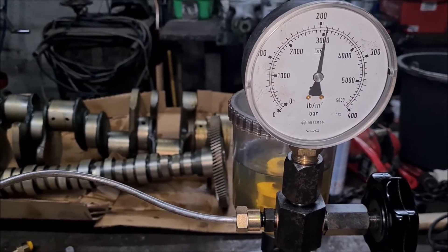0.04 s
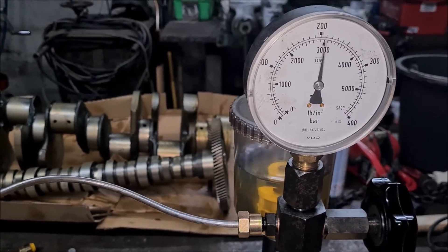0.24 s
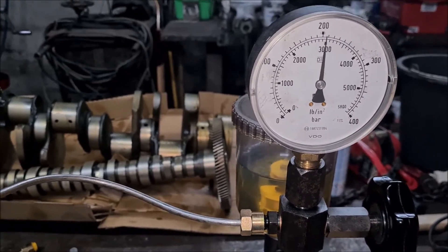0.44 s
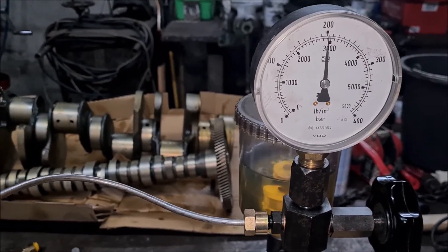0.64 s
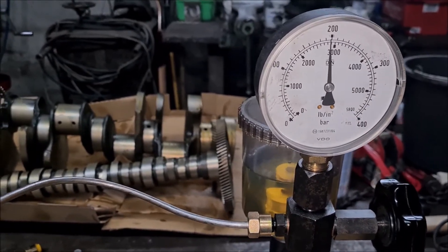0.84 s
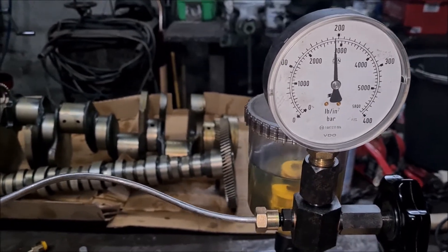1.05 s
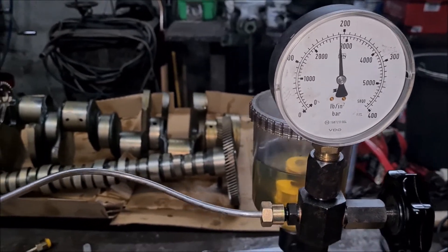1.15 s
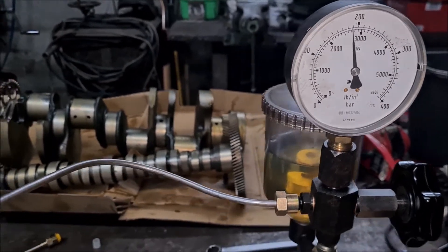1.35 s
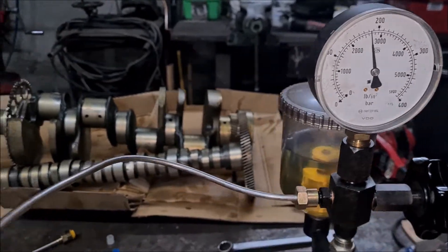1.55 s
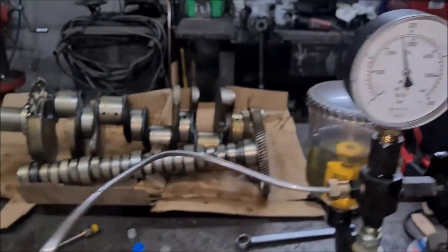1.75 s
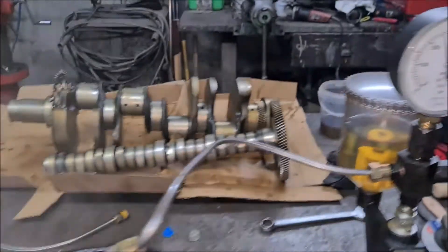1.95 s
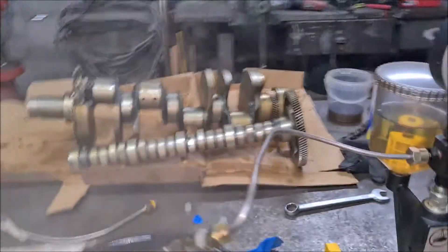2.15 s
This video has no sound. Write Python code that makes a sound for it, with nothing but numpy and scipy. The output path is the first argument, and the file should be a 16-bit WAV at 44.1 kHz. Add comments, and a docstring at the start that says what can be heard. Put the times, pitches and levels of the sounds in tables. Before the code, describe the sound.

One short, hissing chatter from a diesel injector, then handling knocks in a small workshop.

```python
"""A diesel injector chatters on a hand-pumped tester in a small workshop: five quick pops of its needle.
In each pop the needle clacks open and shut, spits a hiss of fuel and sets the steel parts ringing;
an earlier burst is still dying away at the start. Then the tester is handled: it rubs softly and
knocks on the bench. Pops and knocks echo in the room, over a low hum and a faint hiss."""
import sys
import numpy as np
from scipy import signal
from scipy.fft import rfft, irfft, next_fast_len
from scipy.io import wavfile

SR = 44100
rng = np.random.default_rng(int(sys.argv[2]) if len(sys.argv) > 2 else 0)


def digitize_waveform(pressure):
    """Quantize a signal to 16-bit integers and store it at the path in sys.argv[1].

    Rows of a 2-D input are taken as channels; values are limited to [-1, 1].
    """
    field = np.atleast_2d(pressure).T
    bounded = np.clip(field, -1, 1)
    quanta = np.round(bounded * 32767).astype(np.int16)
    wavfile.write(sys.argv[1], SR, quanta)


N = 97020
PRE, SHORT = SR // 2, SR // 4  # samples: lead-in before the scene, length of a short sound
T = np.arange(SR) / SR
SIDES = np.array([[.5], [-.5]])  # splits a difference between left and right
STEEL_RISE_S = 0.011


def amp(db):
    return 10 ** (np.asarray(db) / 20)


def along(points, hz):
    """Read a curve of (f/Hz, value) points on a log frequency axis."""
    freqs, values = np.transpose(points)
    return np.interp(np.log(hz + 1), np.log(freqs + 1), values)


def level(points):
    """Gain per sample from (t/s, level/dB) points."""
    return amp(np.interp(np.arange(N) / SR, *np.transpose(points)))


def filtered(x, response):
    """Scale and shift each frequency of x by response(hz)."""
    n = x.shape[-1]
    padded = next_fast_len(n + 8192)
    return irfft(rfft(x, padded) * response(np.fft.rfftfreq(padded, 1 / SR)), padded)[..., :n]


def noise(colour, size):
    """Stereo noise of strength (rms) 1; colour(hz) gives its tone in dB."""
    # how alike left and right are: f/Hz, likeness (1 = the same)
    alike = [(60, 0.99), (500, 0.79), (1200, 0.12), (2200, 0.22), (4000, 0.32), (8000, -0.2), (15000, 0)]

    def mid_and_side(hz):
        angle = np.arccos(np.clip(along(alike, hz), -1, 1)) / 2
        return amp(colour(hz)) * [np.cos(angle), np.sin(angle)]
    mid, side = filtered(rng.standard_normal((2, size)), mid_and_side)
    stereo = np.array([mid + side, mid - side])
    return stereo / np.sqrt(np.mean(stereo ** 2) + 1e-20)


def swell(rise_s, fade_s):
    """A soft rise, then a fall. A fade time is how long a sound takes to drop 60 dB."""
    return (1 - np.exp(-(T / rise_s) ** 2)) * np.exp(-np.log(1000) * T / fade_s)


def ring(tones, rise_s):
    """Struck metal: a sum of fading pure tones."""
    return sum(amp(db) * swell(rise_s, fade_s) * np.sin(2 * np.pi * hz * T) for hz, db, fade_s in tones)


def puff(colour, rise_s, fade_s):
    """A short burst of noise."""
    return swell(rise_s, fade_s)[:SHORT] * noise(colour, SHORT)


def add(track, s, sound):
    """Lay a sound at s seconds into a track that begins PRE samples early."""
    part = track[:, PRE + round(s * SR):][:, :sound.shape[-1]]
    part += sound[..., :part.shape[-1]]


def lingering(tones, blows):
    """Metal rings on, gathering the energy of one (t/s, level/dB) blow after another."""
    t, out = np.arange(PRE + N) / SR, np.zeros(PRE + N)
    for hz, db, fade_s in tones:
        energy, one_blow = np.zeros((1, PRE + N)), swell(STEEL_RISE_S, fade_s) ** 2
        for s, blow_db in blows:
            add(energy, s, amp(db + blow_db) ** 2 * one_blow)
        strength = energy[0] / np.sqrt(energy[0] + amp(-60) ** 2)  # fades faster below -60 dB
        out += strength * np.sin(2 * np.pi * hz * t)
    return out


def injector():
    """The needle clacks open and shut; each pop sprays fuel and rings the nozzle and the steel."""
    # when the needle pops (only the tail of the first is heard): t/s
    pop_times = (-.16, .2296, .24855, .26565, .2812, .2968)
    # each pop: clack/dB, spray/dB, closing clack over opening clack/dB
    pops = [(-2, -15.5, -7.5), (-11.5, -30.5, -7), (-10.5, -24, 3.5), (-2.5, -16, -15.5), (-11, -19, -11.5),
            (-15, -21, 5)]
    # short ring of the injector: f/Hz, level/dB, fade/s
    clack_tones = [(63.1, -36, 0.12), (242, -36.5, 0.19), (638, -9, 0.018), (971, -9, 0.037),
                   (1213, 7, .012), (1397, -15.5, .022), (1981, -14.5, 0.028), (2285, -19, .028),
                   (2950, -27.5, .022), (3302, -24.5, 0.048)]
    # tone of the fuel jet: f/Hz, level/dB
    spray = [(30, -9), (62, 7.5), (110, 3.5), (250, 1), (380, -5.5), (600, 18), (1200, 0.5), (1700, 4.5),
             (2300, 11), (3300, 4.5), (4300, -1.5), (5000, -3), (6500, -8.5), (9000, -12), (12000, -7.5),
             (14800, -10), (16000, -6.5)]
    # whistles of the nozzle: f/Hz, width/Hz, level/dB
    nozzle = [(3764, 60.6, 1), (4730, 80, -6), (6930, 130, -7.5), (8120, 300, -6.5), (8750, 70, -6.5),
              (9980, 84, 0.5), (10900, 59, -5), (11700, 94, -1), (12150, 150, -2), (13000, 60, -6.5),
              (13680, 74, -3.5), (15300, 150, -4)]
    # long ring of the steel pipe and stand: f/Hz
    steel_hz = (521, 619.5, 840, 956, 1083, 1165, 1221, 1285, 1406, 1857, 1992, 2445, 2643)
    # each of those pitches: level/dB, fade/s
    steel = [(-53, 2.7), (-29.5, 0.88), (-32, .45), (-32, 0.25), (-44.5, 0.78), (-50, 0.75), (-29, 0.35),
             (-40.5, 0.7), (-24.5, 0.31), (-48, 0.6), (-44.5, 0.25), (-46.5, 0.28), (-46, 0.19)]

    def whistle(hz):
        power = sum(amp(db) ** 2 / (1 + (2 * (hz - peak) / width) ** 2) for peak, width, db in nozzle)
        return 10 * np.log10(power)
    track, blows = np.zeros((2, PRE + N)), []
    clack, open_s = ring(clack_tones, rise_s=0.0017), 0.003423
    for s, (clack_db, spray_db, closing_db) in zip(pop_times, pops):
        add(track, s, amp(clack_db) * clack)
        add(track, s + open_s, amp(clack_db + closing_db) * clack)
        add(track, s, amp(spray_db) * puff(lambda hz: along(spray, hz), rise_s=.0026, fade_s=.04))
        add(track, s, amp(spray_db - 10) * puff(whistle, rise_s=.002, fade_s=0.094))
        blows.append((s, clack_db))
    steel_tones = [(hz, db, fade_s) for hz, (db, fade_s) in zip(steel_hz, steel)]
    return workshop(track, echo_db=-8.5) + lingering(steel_tones, blows)


def workshop(x, echo_db):
    """Add the room's echo, in which each frequency dies at its own speed."""
    # length of the echo: f/Hz, fade/s
    fades = [(100, 3), (600, 0.42), (1300, 0.547), (2500, .48), (4500, 0.4), (8000, 0.3), (15000, 0.17)]
    # tone of the echo: f/Hz, level/dB
    colour = [(100, -0.5), (600, -1.5), (1200, -3), (2500, -2.5), (6000, -3.5), (15000, -4.5)]
    hz, t, spectrum = signal.stft(noise(np.zeros_like, SR), SR, nperseg=256)
    fade_s = along(fades, hz)[:, None]
    fall = np.exp(-np.log(1000) * t / fade_s)
    fall *= np.sqrt(2 * np.log(1000) / (fade_s * SR))  # same energy for long and short fades
    tail = signal.istft(spectrum * fall * amp(along(colour, hz))[:, None], SR)[1][:, :SR]
    tail *= 1 - np.exp(-(T / .008) ** 2)  # builds up over about 8 ms
    return x + amp(echo_db) * signal.fftconvolve(x, tail, axes=1)[:, :x.shape[-1]]


def room_noise():
    """A steady hum and low rumble, with a faint hiss that drifts in level."""
    # tones of the hum: f/Hz, level/dB
    hum_tones = [(50, -81.5), (113, -78.5), (522, -81)]
    # tone of the rumble: f/Hz, level/dB
    rumble_colour = [(25, -10), (45, 1), (70, 0.5), (125, -2.5), (170, -8.5), (250, -12.5), (360, -15.5),
                     (520, -17.5), (750, -19), (1300, -24.5), (2300, -41), (6000, -50), (9000, -69)]
    # tone of the hiss: f/Hz, level/dB
    hiss_colour = [(1000, -11.5), (4000, -6.5), (6500, -8), (8700, 0), (11000, -3.5), (15500, 0)]
    # loudness of the hiss: t/s, level/dB
    hiss_level = [(0, -73.5), (.7, -76.5), (1.2, -78.5), (1.6, -70), (1.85, -70), (2.05, -67.5),
                  (2.2, -69.5)]
    t = np.arange(N) / SR
    hum = sum(amp(db) * np.sqrt(2) * np.sin(2 * np.pi * (hz * t + rng.random())) for hz, db in hum_tones)
    rumble = amp(-60.5) * noise(lambda hz: along(rumble_colour, hz), N)
    hiss = level(hiss_level) * noise(lambda hz: along(hiss_colour, hz), N)
    return hum + rumble + hiss


def rubbing():
    """Handling the tester makes a soft rubbing noise."""
    # loudness of the rub: t/s, level/dB
    loudness = [(0, -92), (1.2, -85.5), (1.42, -62), (1.55, -59.5), (1.9, -60.5), (2.2, -63.5)]
    # its tone: f/Hz, level/dB
    colour = [(70, 7.5), (150, 0), (250, -0.5), (400, -4), (850, 1), (1050, -10.5), (1350, 4.5),
              (1700, -19.5), (3000, -20.5), (7000, -37.5), (16000, -46.5)]
    return level(loudness) * noise(lambda hz: along(colour, hz), N)


def knocks():
    """The tester's base hits the bench: heavy blows have more bass, hard ones more treble."""
    # each knock: t/s, level/dB, bass/dB, treble slope/(dB per octave), left minus right/dB, long ring/dB
    blows = [(1.2690, -47.5, -2, -30, 3.5, -55), (1.3655, -37, -16.5, -2.5, 2, -43),
             (1.6413, -33, -9, 0, 0.5, -52), (1.6950, -29.5, -13, -5, 5, -42),
             (1.6971, -20.5, -9, -2, 2.5, -24.5), (1.7322, -29.5, 4.5, -25, -0.5, -44),
             (1.7385, -41.5, 14.5, -23, 6, -42), (1.7470, -33.5, 7.5, -5, 0, -37),
             (1.7705, -37, 0, -17, 5, -39), (1.7887, -31, 7, -9.5, 1, -26), (1.8530, -67, 28, -31, 0, -61),
             (1.9672, -27.5, -1, -6, 0, -24.5), (1.9765, -38, 6, -10.5, -3.5, -33)]
    # short ring of the base: f/Hz, level/dB, fade/s
    base_tones = [(487, -11, 0.075), (641.4, -2.5, 0.057), (799, -6.5, 0.076), (947, -11, 0.05),
                  (1196, -1.5, 0.026), (1300, -7, 0.064), (1417, -16.5, 0.063), (2060, -16.5, 0.065),
                  (2795, -16.5, 0.05), (4720, -23, 0.051), (5900, -20, 0.037)]
    # its long ring: f/Hz, level/dB, fade/s
    long_tones = [(248, -33.5, 0.68), (599.4, -12, 0.31), (1213, -24.5, 0.18), (1390, -40, 0.083),
                  (2850, -32, 0.092)]
    # dull crunch of the contact: f/Hz, level/dB
    contact = [(100, -24), (250, -23), (350, -25), (520, -2.5), (1250, -1), (1650, -12), (2200, -18),
               (3300, -25), (4600, -25.5), (7000, -31), (10000, -40), (16000, -48)]
    # metal parts rattling after a blow: f/Hz, level/dB
    parts = [(200, -32), (550, 2.5), (1300, 5.5), (1700, 2.5), (2800, -4), (5000, -14), (12500, -15.5),
             (16000, -29)]
    rise_s, bass_hz, treble_hz = 0.0011, 725, 1140
    track, base = np.zeros((2, PRE + N)), ring(base_tones, rise_s)[:SHORT]
    for s, db, bass_db, slope_db, pan_db, _ in blows:
        def tone(hz):
            bass = bass_db / (1 + (hz / bass_hz) ** 6)
            treble = slope_db * np.log2(np.maximum(hz / treble_hz, 1))
            return amp(db + bass + treble)
        crunch = amp(1) * puff(lambda hz: along(contact, hz), rise_s, fade_s=.045)
        rattle = amp(-17) * puff(lambda hz: along(parts, hz), STEEL_RISE_S, fade_s=.16)
        add(track, s, amp(pan_db * SIDES) * filtered(base + crunch + rattle, tone))
    ring_levels = [(s, ring_db) for s, *_, ring_db in blows]
    return workshop(track, echo_db=-9) + lingering(long_tones, ring_levels)


def off_centre(x):
    """The tester stands off centre: mostly louder on the left, a touch earlier on the right."""
    # balance of the two sides: f/Hz, left minus right/dB
    leaning = [(60, 2.5), (600, -1.5), (1250, 4.5), (2400, -1), (4400, 3.45), (8000, -0.6), (13000, 2)]
    delay_s = .0001 * SIDES
    return filtered(x, lambda hz: amp(along(leaning, hz) * SIDES) * np.exp(-2j * np.pi * hz * delay_s))


def scene():
    """Pops and knocks come from the tester; the room lies around them."""
    return off_centre(injector() + knocks())[:, PRE:] + room_noise() + rubbing()


def record(dry):
    """Cut away the very highest treble."""
    top_hz = 15900
    return filtered(dry, lambda hz: 1 / (1 + (hz / top_hz) ** 160))


dry = scene()
out = record(dry)
digitize_waveform(out)
```